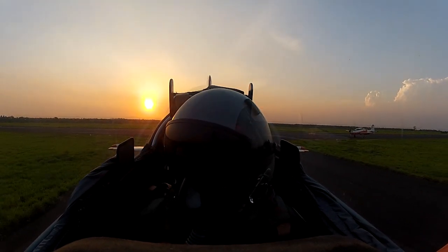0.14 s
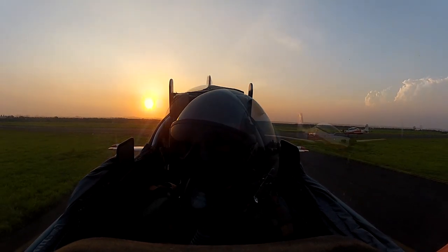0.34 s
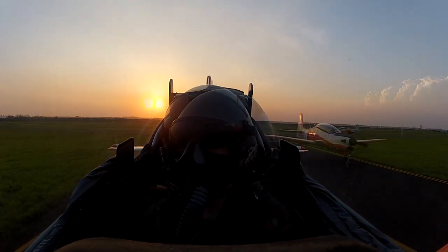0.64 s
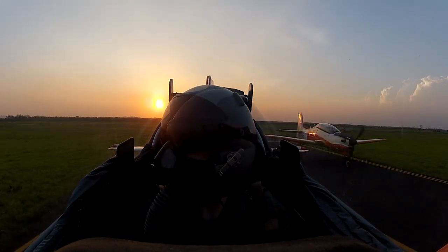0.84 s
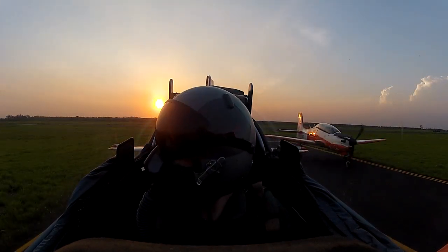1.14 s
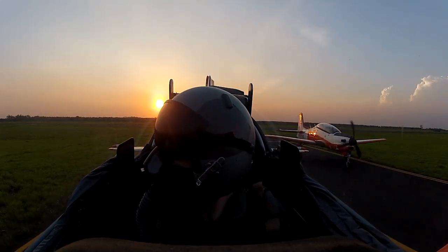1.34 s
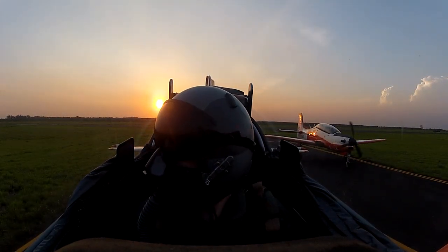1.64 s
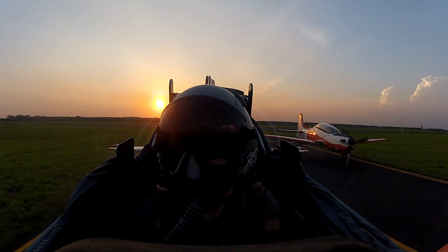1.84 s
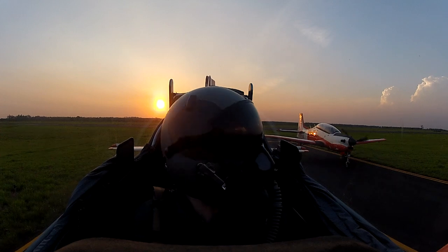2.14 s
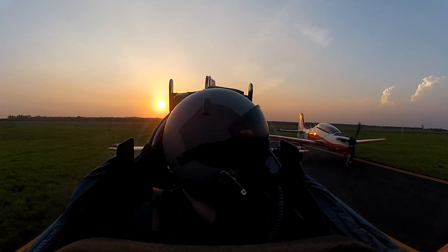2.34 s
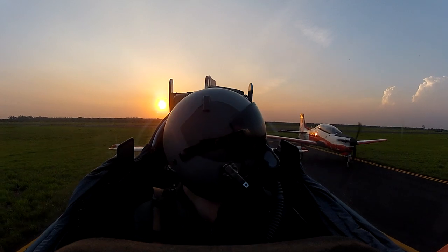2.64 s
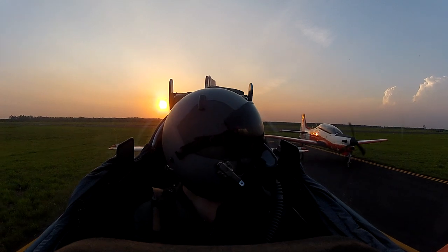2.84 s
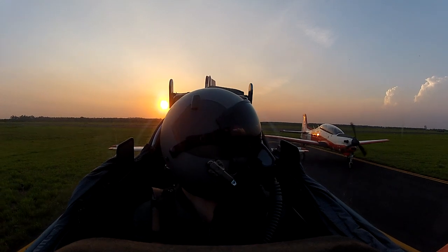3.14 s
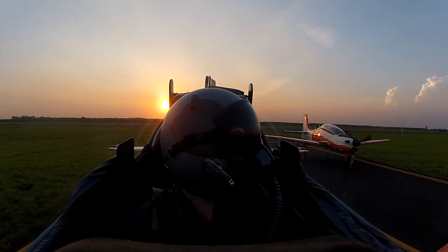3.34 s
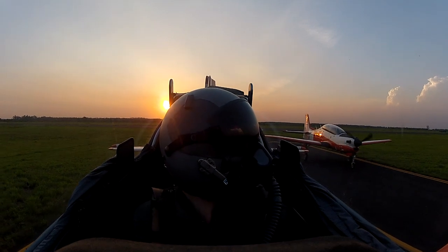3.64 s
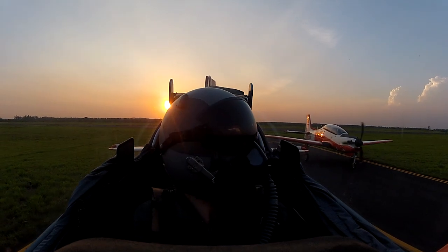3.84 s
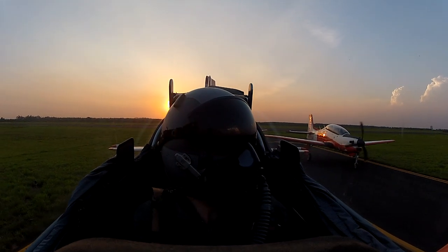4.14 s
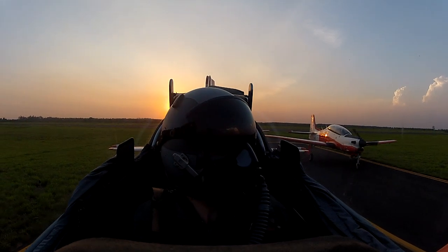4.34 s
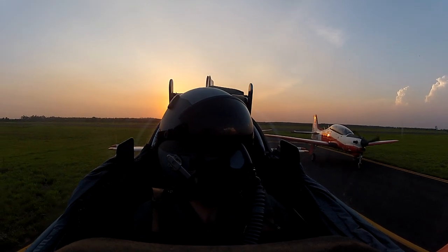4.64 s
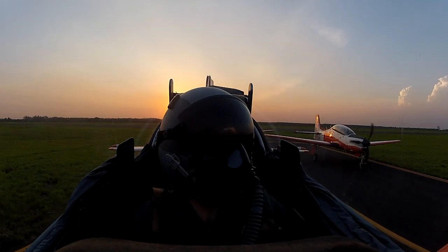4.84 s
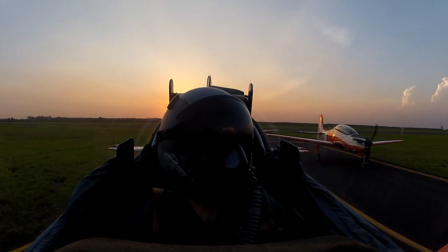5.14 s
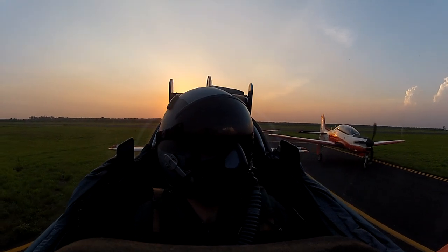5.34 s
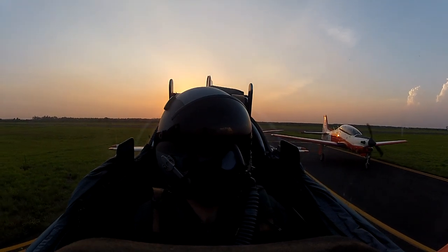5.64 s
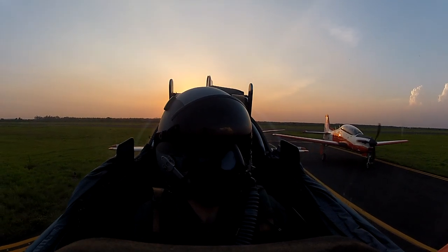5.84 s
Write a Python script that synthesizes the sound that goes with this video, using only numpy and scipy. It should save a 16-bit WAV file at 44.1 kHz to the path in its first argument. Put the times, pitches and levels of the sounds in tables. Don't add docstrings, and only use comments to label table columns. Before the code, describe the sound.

Inside a closed cockpit, two turboprops' deep propeller drones beat in a fast flutter, with rumbling airflow, faint turbine whine and early wheel thumps.

```python
import sys
import numpy as np
from scipy import signal
from scipy.fft import rfft, irfft
from scipy.io import wavfile
from scipy.ndimage import uniform_filter1d

SR = 44100
rng = np.random.default_rng(int(sys.argv[2]) if len(sys.argv) > 2 else 0)


def voltage_ratio(decibels):
    exponent = np.asarray(decibels, float) / 20
    return 10 ** exponent


def dump_mix(stems):
    frames = np.atleast_2d(stems).T
    limited = np.clip(frames, -1, 1)
    pcm = np.round(limited * 32767).astype(np.int16)
    wavfile.write(sys.argv[1], SR, pcm)


N = 264600

# t/s, near level/dB, neighbour level/dB
THRUM_LEVELS = [(0, -31.5, -33), (.3, -21.5, -20.5), (.47, -24, -29.5), (1, -17.5, -21), (1.3, -12.5, -15),
                (1.8, -20, -24), (2.2, -20, -22), (2.55, -18.5, -18.5), (2.75, -16, -24), (3.1, -22, -19),
                (3.55, -16.5, -19), (4.05, -20, -20), (4.25, -17, -19), (4.55, -16.5, -20),
                (5.05, -19, -18), (5.25, -19, -31.5), (5.55, -17.5, -14.5), (6, -15.5, -18.5)]
RISE_START_S = 0.48


def in_time(rows):
    s, *columns = np.transpose(rows)
    return [np.interp(np.arange(N) / SR, s, c) for c in columns]


def rms_one(x):
    return x / np.sqrt(np.mean(x ** 2))


def drift(rate):
    r = np.exp(-80 * np.pi * rate / SR)
    noise = rng.standard_normal(N // 40 + 2002)
    slow = signal.lfilter([1], [1, -2 * r, r * r], noise)[2000:]
    return np.interp(np.arange(N) / 40, np.arange(len(slow)), rms_one(slow))


def tone(turns, db):
    return np.sqrt(2) * voltage_ratio(db) * np.cos(2 * np.pi * turns)


def ramp(start_s, rise_s):
    return np.clip((np.arange(N) / SR - start_s) / max(rise_s, 1e-3), 0, 1)


def swells(rows, rest_db):
    power = voltage_ratio(rest_db) ** 2
    for start, attack, hold, release, db in rows:
        shape = ramp(start, attack) * (1 - ramp(start + attack + hold, release))
        power = power + (voltage_ratio(db) * shape) ** 2
    return 10 * np.log10(power)


def turbulence(spectrum, patchy_db):
    hz = np.maximum(np.arange(N // 2 + 1) * SR / N, 1)
    points, level_db = np.transpose(spectrum)
    colour_db = np.interp(np.log(hz), np.log(points), level_db, -120, -120)
    coloured = rfft(rng.standard_normal(N)) * voltage_ratio(colour_db)
    place = 3 * np.log2(hz / points[0])
    slices = int(3 * np.log2(points[-1] / points[0])) + 2
    out = np.zeros(N)
    for k in range(slices):
        overlap = np.clip(1 - abs(place - k), 0, 1)
        out += irfft(coloured * overlap, N) * voltage_ratio(patchy_db * drift(14.0))
    return rms_one(out)


def blade_turns():
    # t/s, near f/Hz, neighbour f/Hz
    blade_rates = [(0, 80.6, 84.1), (.75, 80.62, 84.18), (1, 80.43, 84.32), (1.25, 80.12, 84.28),
                   (1.75, 79.26, 84.17), (2, 79.03, 84.15), (3.5, 78.56, 84.09), (4, 78.53, 84.12),
                   (4.65, 78.42, 84.11), (6, 78.98, 84.12)]
    middle_turns = .23, .47
    counts = [np.cumsum(hz) / SR for hz in in_time(blade_rates)]
    return [c - c[N // 2] + start for c, start in zip(counts, middle_turns)]


def load():
    # middle t/s, half length/s, wash level/dB, hiss level/dB
    gusts = [
        (.72, 0.6, -1.5, -3),
        (0.954, 0.35, 0.5, 1.5),
        (1.38, 0.18, 0.5, -.5),
        (4.18, 0.3, -0.5, 0.5),
    ]
    early = 1 - ramp(RISE_START_S, rise_s=0.36)
    wash_db = -24 - 4 * early
    roar_db = -39.5 - 8 * early
    hiss_db = -51.5 - 1.5 * early
    for at, half, wash_gust_db, hiss_gust_db in gusts:
        gust = ramp(at - half, half) - ramp(at, half)
        wash_db = wash_db + wash_gust_db * gust
        hiss_db = hiss_db + hiss_gust_db * gust
    return wash_db, roar_db, hiss_db


def thrum(near, far):
    gust_db = 1.3 * drift(6.4)
    return sum(tone(turns + .018 * drift(6.7), db + gust_db)
               for turns, db in zip((near, far), in_time(THRUM_LEVELS)))


def overtones(near, far):
    overtone_levels = [-28, -76, -43.5, -51, -44, -49, -51.5, -59, -53, -56, -65]
    sum_tones = [(1, 1), (0, 2), (2, 1), (1, 2), (0, 3), (3, 1), (2, 2)]
    sum_levels = [-33.5, -46.5, -36, -45, -47.5, -62.5, -53]
    near_db, far_db = in_time(THRUM_LEVELS)
    near_rise_db = near_db - np.median(near_db)
    far_rise_db = far_db - np.median(far_db)

    early = 1 - ramp(RISE_START_S - .15, rise_s=1)
    second_db = 0.57 - 11 * early
    higher_db = -.5 - 12.5 * early
    out = np.zeros(N)
    for k, db in enumerate(overtone_levels):
        bite_db = higher_db if k else second_db
        scatter = (.05 + .004 * k ** 2) * drift(5)
        waver_db = (2.4 + .15 * k) * drift(4)
        out += tone((k + 2) * near + .07 + scatter, db + bite_db + waver_db)

    for (a, b), db in zip(sum_tones, sum_levels):
        rise_db = 0.5 * (a * near_rise_db + b * far_rise_db)
        lag = .27 if a + b == 2 else -.15
        out += tone(a * near + b * far - lag, db + rise_db + drift(4.2))
    alternator = tone(5.025 * near, -49 + higher_db + 3.7 * drift(1.4))
    return out + alternator


def airflow(near, far, wash_db, roar_db, hiss_db):
    # f/Hz, level/dB per Hz
    wash_colour = [(20, -24), (40, -19.5), (55, -9), (68, -8.5), (100, 0.5), (150, -1.5), (180, -0.5),
                   (200, -8.5), (240, -9), (280, -14.5), (320, -15), (360, -22), (400, -29.5), (520, -47)]
    # f/Hz, level/dB per Hz
    roar_colour = [(380, 8), (450, -0.5), (550, 4), (620, -3.5), (700, -5), (900, -8), (980, -10.5),
                   (1300, -37)]
    # f/Hz, level/dB per Hz
    canopy_colour = [(850, -27.5), (1000, -2), (1080, 3.1), (1190, -0.5), (1300, -11.5), (1500, -12.5),
                     (1800, -11), (2000, -30)]
    # f/Hz, level/dB per Hz
    hiss_colour = [(1700, -29), (1950, -2.5), (2100, 1), (2200, -3.5), (2350, 4), (2500, -1), (2800, -9),
                   (2950, -3), (3200, -5), (3300, -12), (3750, -8), (4100, -17), (4350, -7), (4700, -18)]
    # f/Hz, level/dB per Hz
    top_colour = [(4400, -12), (4600, -6), (4750, 2.2), (5000, -0.5), (5300, 4), (5500, -2), (5800, -7),
                  (6000, -10), (6300, -36)]
    beat = np.cos(2 * np.pi * (far - near))
    wash = voltage_ratio(wash_db + 1.06 + 2 * beat) * turbulence(wash_colour, patchy_db=-0.63)
    roar = voltage_ratio(roar_db + 0.83 + 0.67 * beat) * turbulence(roar_colour, patchy_db=0.74)
    canopy_db = 0.29 * roar_db + 0.69 * hiss_db - 2.0
    canopy = voltage_ratio(canopy_db) * turbulence(canopy_colour, patchy_db=1.0)
    hiss = voltage_ratio(hiss_db + 2.5) * turbulence(hiss_colour, patchy_db=0.97)
    top = voltage_ratio(hiss_db - 8.5) * turbulence(top_colour, patchy_db=-0.2)
    return wash + roar + canopy + hiss + top


def hums(roar_db):
    hum_pitches = [103, 115, 125, 140, 400.7, 425, 535, 2640, 2697, 2778, 3362, 3445, 3652]
    # level/dB, waver/dB
    hum_levels = [(-37, -0.5), (-40.5, 4.5), (-35, 5), (-37.5, 3.0), (-46.5, 2), (-55, 5.5), (-53.5, 3),
                  (-82, 3), (-73, 3), (-68, -5), (-72.5, 2), (-72, 2), (-78, 0.83)]
    swell_db = uniform_filter1d(roar_db, size=SR // 2) - np.median(roar_db)
    s = np.arange(N) / SR
    return sum(tone(hz * s + 0.2 * drift(1.2), db + 0.91 * swell_db + waver_db * drift(8.9))
               for hz, (db, waver_db) in zip(hum_pitches, hum_levels))


def turbine(near):
    # t/s, f/Hz
    spool_pitch = [(0, 2235), (.4, 2247), (.6, 2272), (.8, 2284), (1.1, 2276), (1.5, 2260), (2, 2245),
                   (2.4, 2236), (2.7, 2230), (3.1, 2226), (4.3, 2226), (5, 2228.5), (6, 2229)]
    # start t/s, attack/s, hold/s, release/s, level/dB
    spool_swells = [
        (.35, 0.19, .08, .12, -54),
        (.72, .25, 0.31, .15, -53.5),
        (1.4, 0.07, 0.56, 0.65, -48.5),
        (2.3, .2, 0.26, .7, -55.5),
        (4.3, 0.28, .6, .5, -63),
    ]
    octave_swells = [
        (.5, 0.18, .45, .2, -70),
        (1.55, .1, .35, .15, -71),
        (2.4, 0.66, 3.2, .1, -66),
        (2.8, 0.18, 0.18, .3, -66),
    ]
    side_swells = [
        (1.42, .06, 1, .3, -72),
        (2.2, .85, 3.2, .1, -64),
    ]
    gear_swells = [
        (1.27, .13, 0.71, .5, -67.5),
    ]
    tone_db = swells(spool_swells, rest_db=-68)
    octave_db = swells(octave_swells, rest_db=-86)
    side_db = swells(side_swells, rest_db=-80)
    gear_db = swells(gear_swells, rest_db=-88)
    spool = np.cumsum(in_time(spool_pitch)[0]) / SR
    whine = tone(spool, tone_db + .8 * drift(8))
    octave = tone(2 * spool, octave_db + 1.5 * drift(6))
    sideband = tone(spool - near, side_db + 1.6 * drift(7))
    gear = tone(1.942 * spool, gear_db)
    return whine + octave + sideband + gear


def wheels():
    # t/s, peak level/dB, f/Hz, half length/s
    thumps = [
        (0.034, -12.5, 93, 0.038),
        (0.133, -19, 105.5, 0.056),
        (.185, -14.5, 103, 0.032),
        (0.334, -18, 102.4, 0.12),
        (0.409, -14, 99, 0.022),
        (0.488, -20, 112, 0.078),
        (0.527, -22, 134, 0.039),
        (1.046, -15, 120, 0.013),
        (1.816, -12, 126, 0.017),
        (1.9, -15.5, 135.6, 0.052),
    ]
    s, out = np.arange(N) / SR, np.zeros(N)
    for at, db, hz, length in thumps:
        part = slice(max(round((at - length) * SR), 0), round((at + length) * SR))
        since = s[part] - at
        swell = np.cos(np.pi / 2 * since / length) ** 2
        out[part] += voltage_ratio(db) * swell * np.cos(2 * np.pi * hz * since)
    return out


def scene():
    near, far = blade_turns()
    wash_db, roar_db, hiss_db = load()
    blades = thrum(near, far) + overtones(near, far)
    air = airflow(near, far, wash_db, roar_db, hiss_db)
    return (blades + air + hums(roar_db) + turbine(near) + wheels())[None]


def top_cut(x):
    return signal.sosfilt(signal.butter(12, 15290, fs=SR, output="sos"), x)


def record(dry):
    held_hz, carrier_hz, overload = 12000, 48000, .61
    coarse = signal.resample_poly(dry, held_hz, SR, axis=1)
    coarse = np.clip(coarse, -overload, overload)
    held = np.repeat(coarse, carrier_hz // held_hz, axis=1)
    mix = signal.resample_poly(held, SR, carrier_hz, axis=1)[:, :N]
    return top_cut(mix)


dry = scene()
out = record(dry)
dump_mix(out)
```